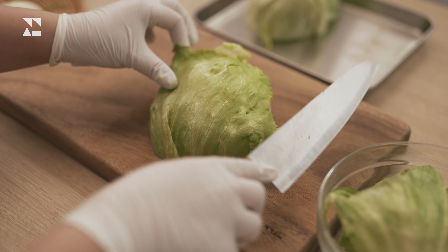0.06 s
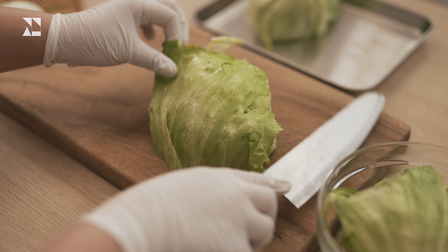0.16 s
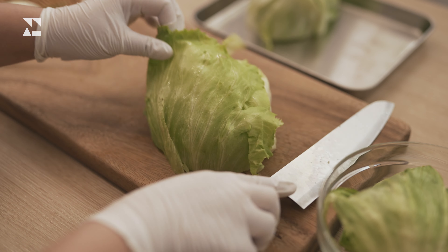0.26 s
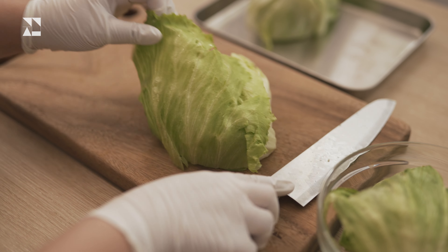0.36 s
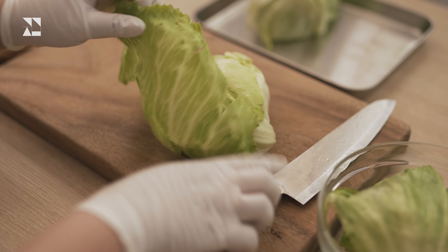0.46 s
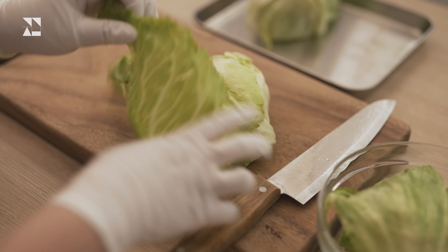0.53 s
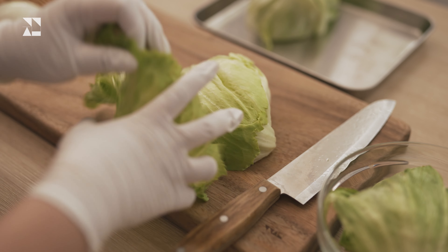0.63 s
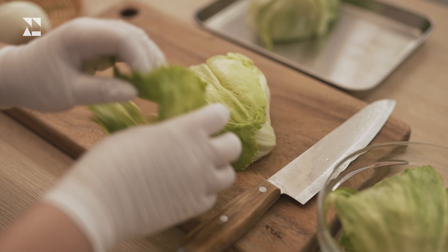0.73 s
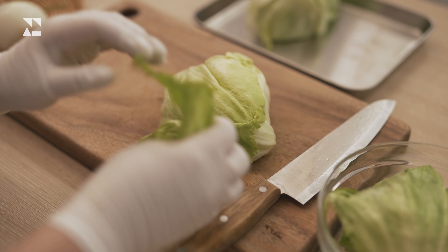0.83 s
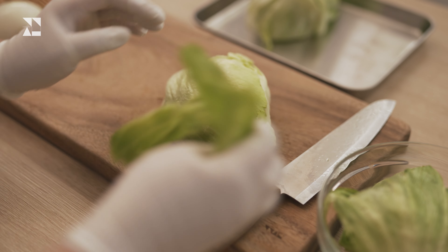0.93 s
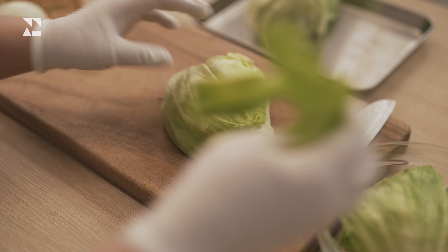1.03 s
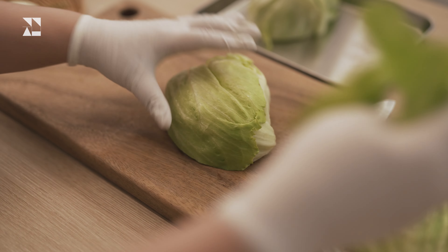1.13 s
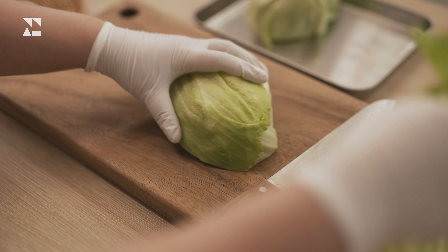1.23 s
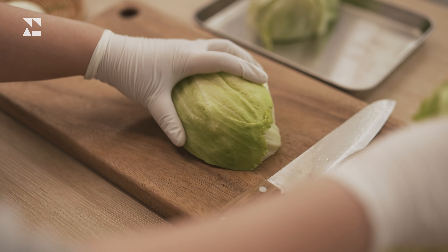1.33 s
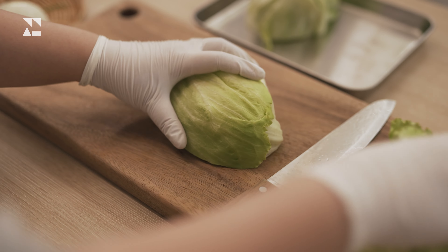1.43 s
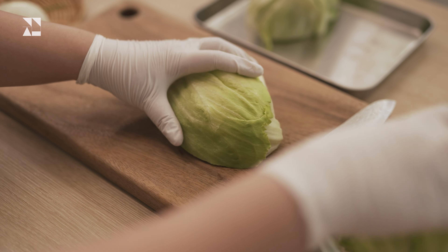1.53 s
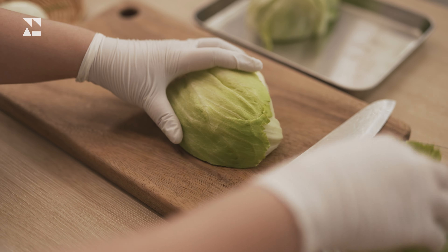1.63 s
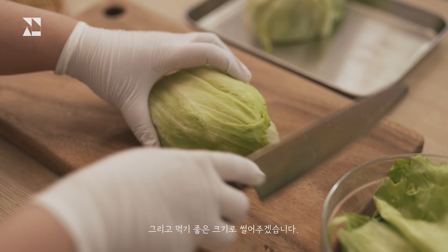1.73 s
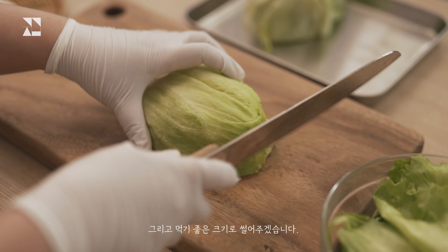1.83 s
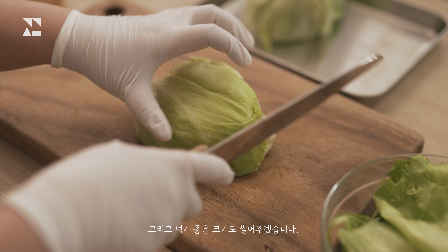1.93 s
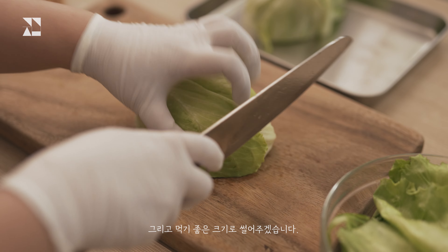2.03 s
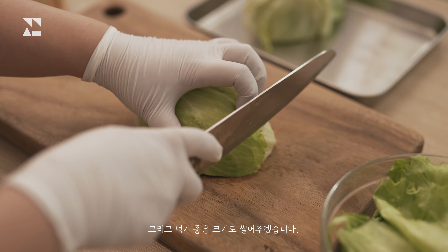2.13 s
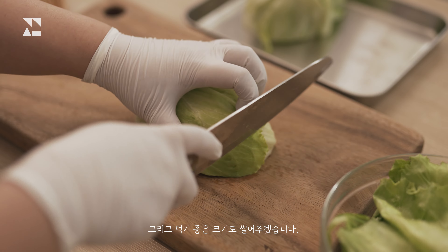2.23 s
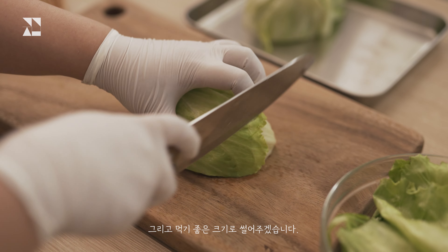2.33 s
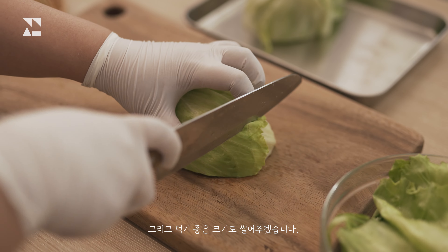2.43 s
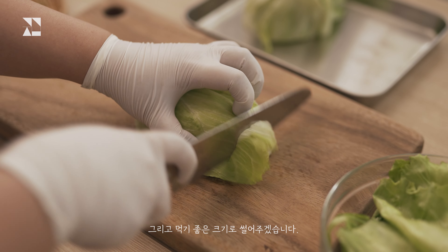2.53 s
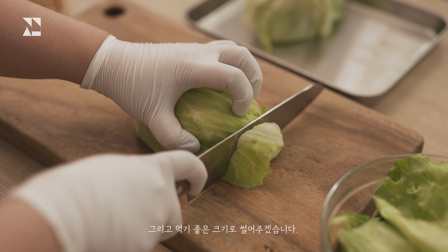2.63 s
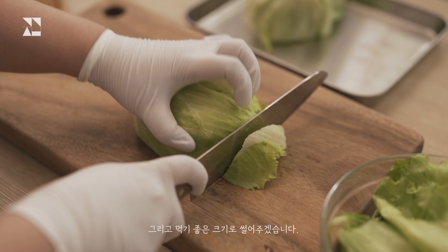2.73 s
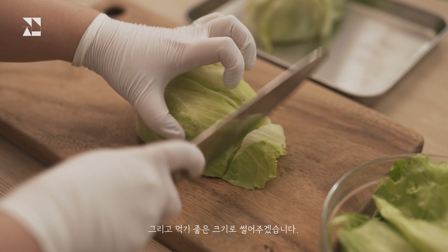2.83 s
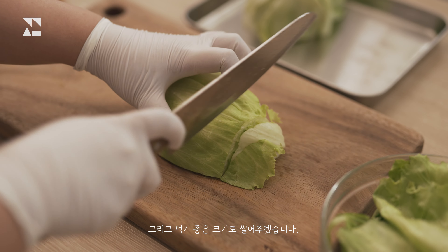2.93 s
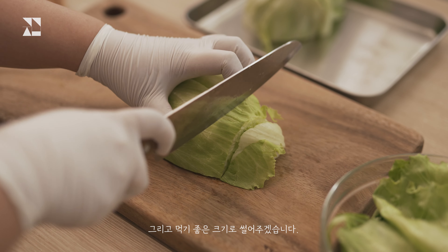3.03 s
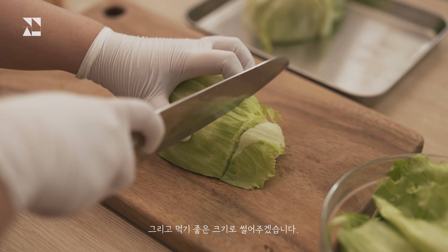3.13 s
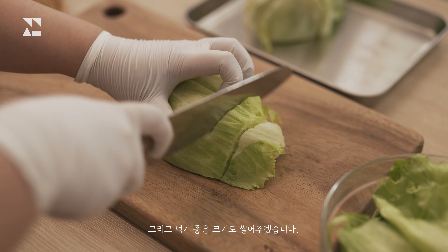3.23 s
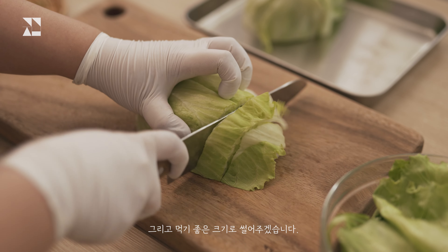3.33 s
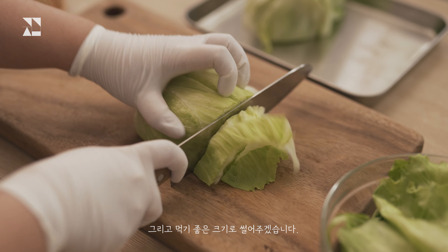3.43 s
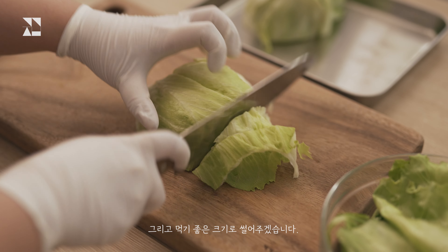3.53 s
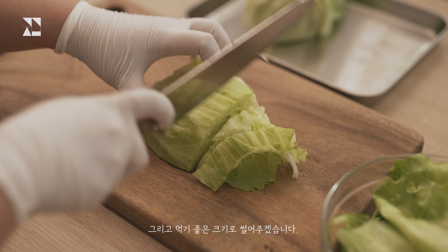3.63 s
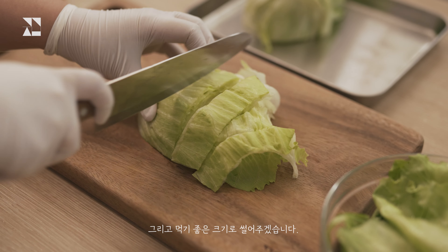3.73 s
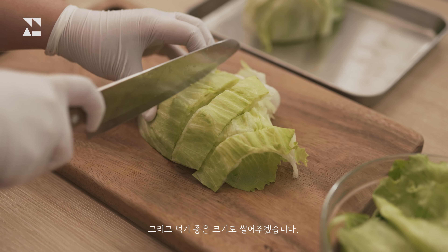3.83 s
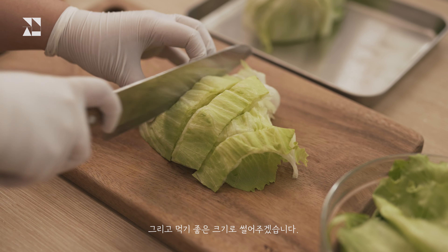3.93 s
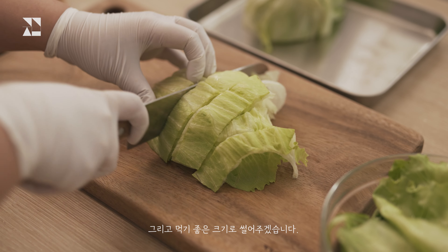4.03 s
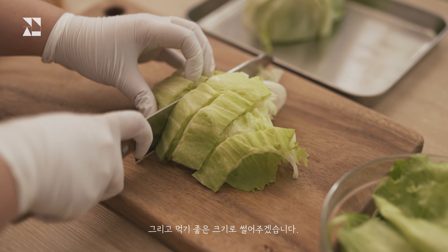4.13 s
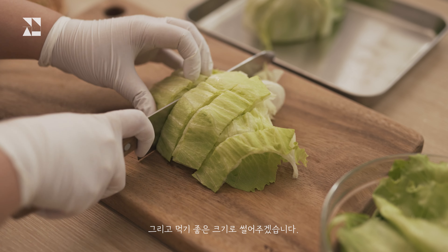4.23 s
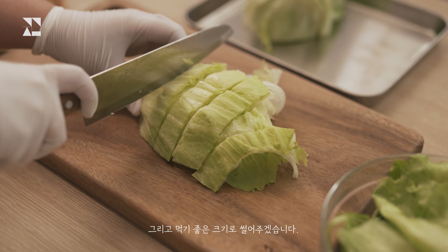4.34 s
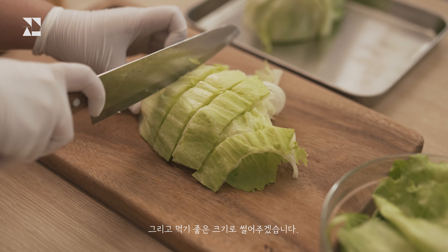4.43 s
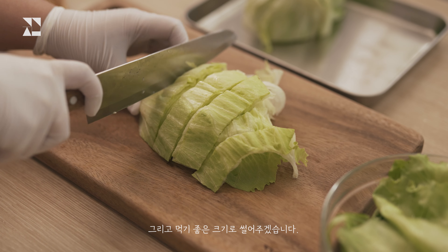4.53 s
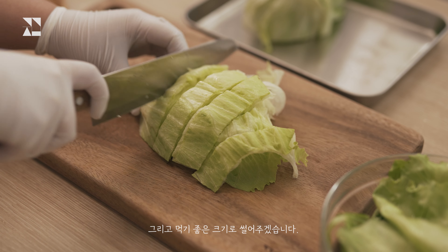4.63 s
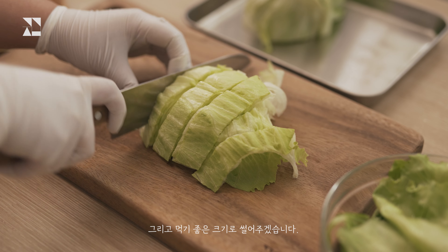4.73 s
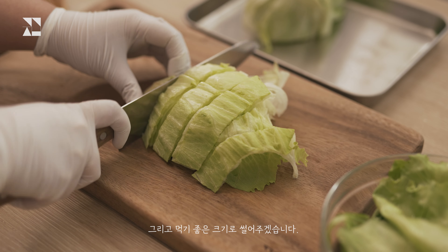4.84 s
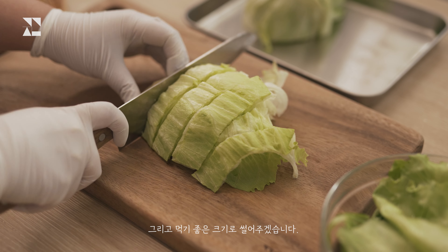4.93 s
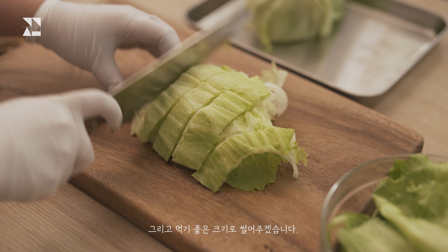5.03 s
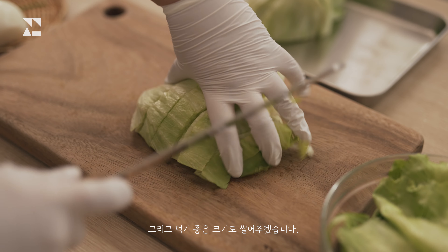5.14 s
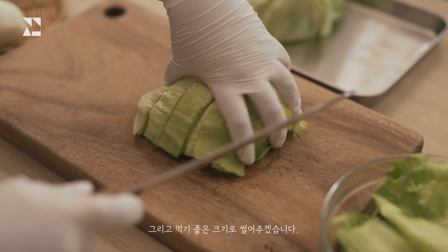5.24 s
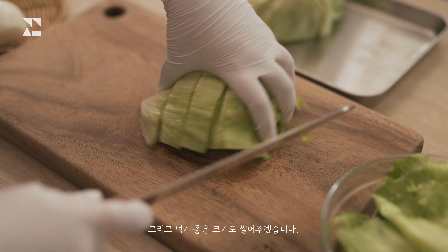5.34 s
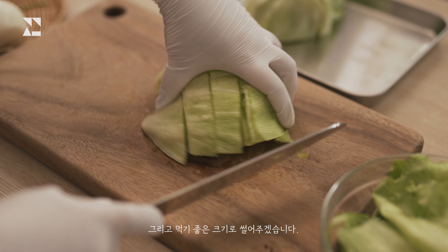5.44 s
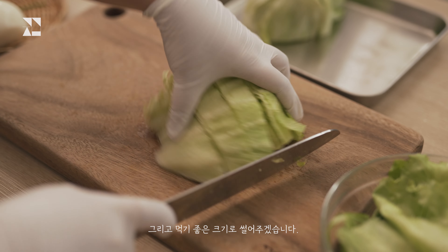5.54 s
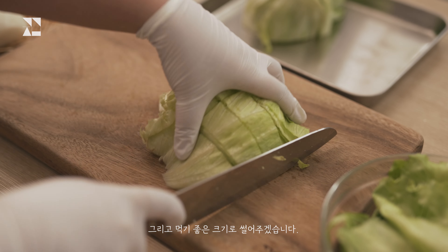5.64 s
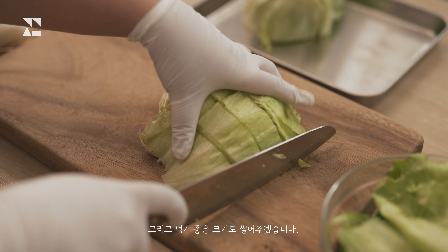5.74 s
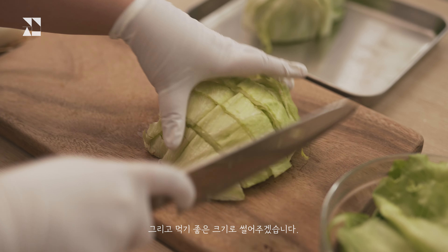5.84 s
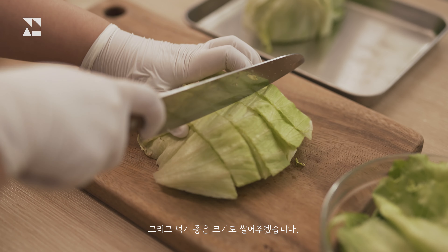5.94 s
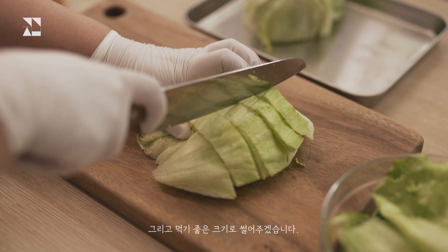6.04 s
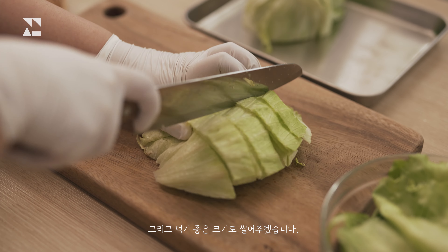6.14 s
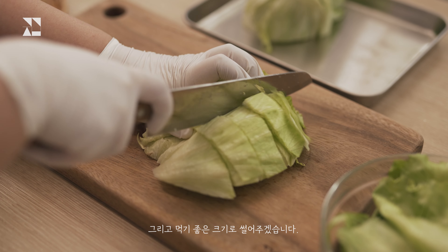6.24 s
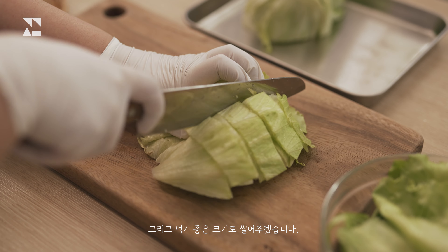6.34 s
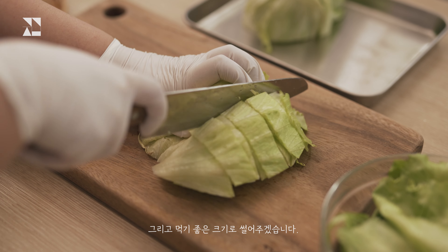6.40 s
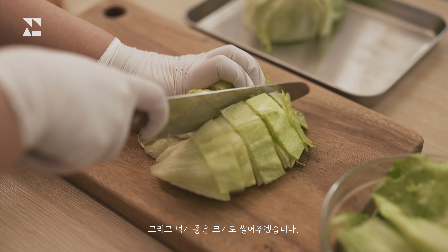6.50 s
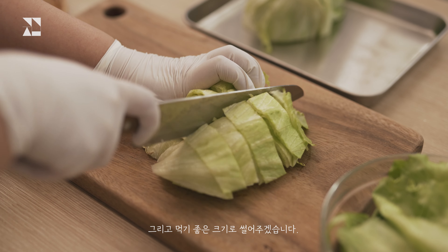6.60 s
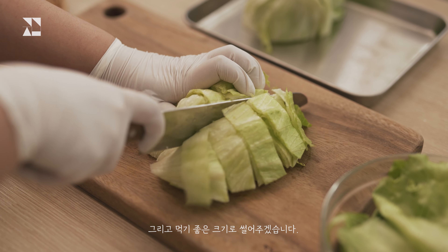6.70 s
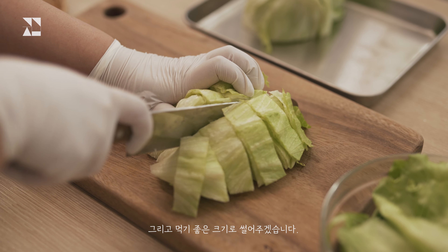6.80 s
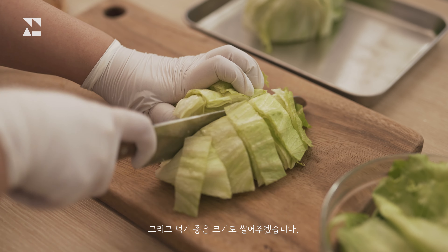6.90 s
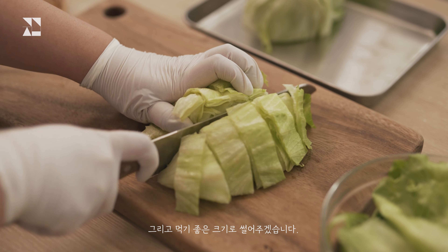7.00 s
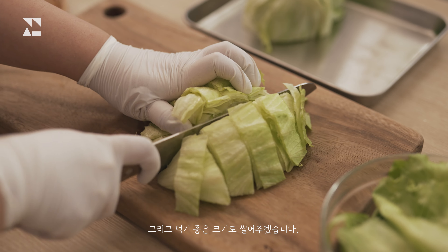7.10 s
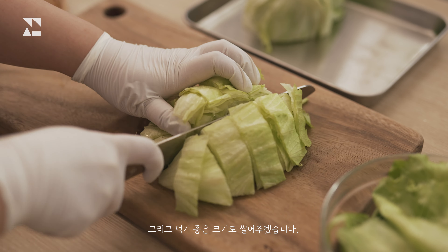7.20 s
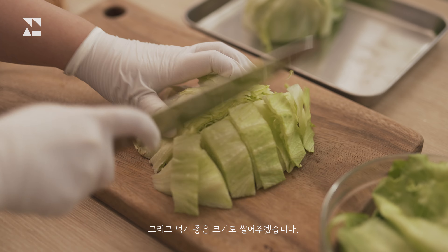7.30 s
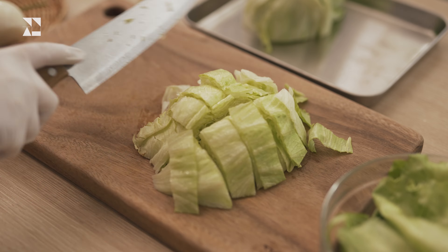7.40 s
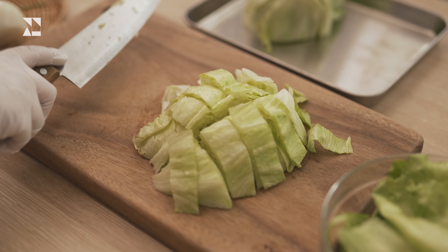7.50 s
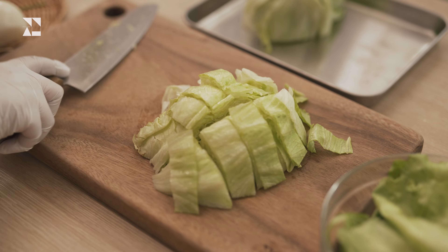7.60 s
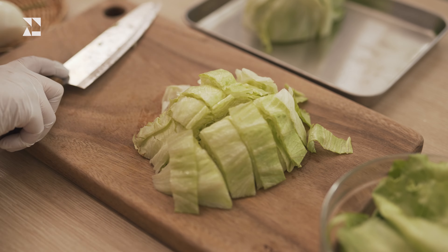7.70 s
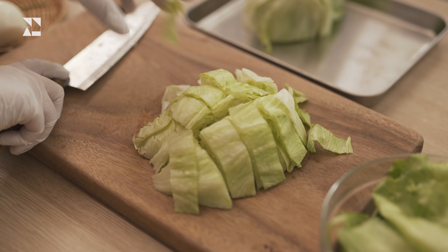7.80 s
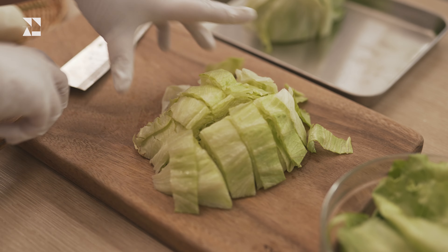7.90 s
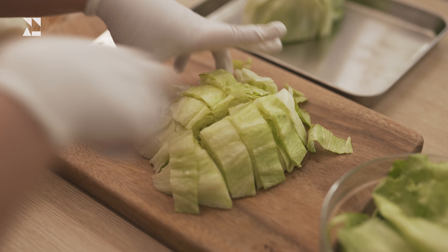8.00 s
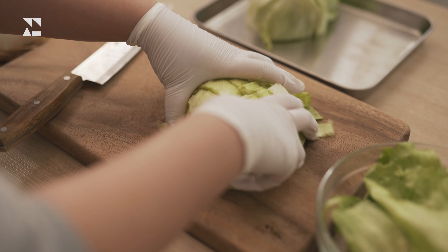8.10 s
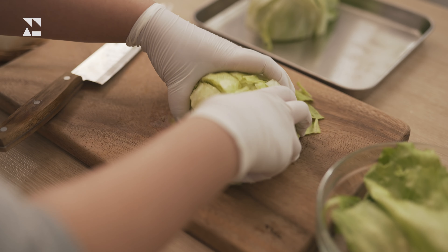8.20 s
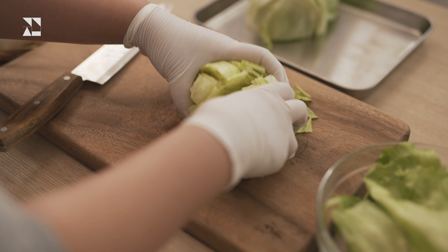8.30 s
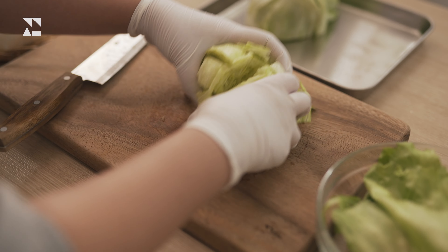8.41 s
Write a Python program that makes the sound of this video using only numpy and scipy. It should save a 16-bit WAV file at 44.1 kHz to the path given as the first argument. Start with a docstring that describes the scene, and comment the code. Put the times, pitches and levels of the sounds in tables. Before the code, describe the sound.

Gloved hands rustle and peel a crisp lettuce head, then a knife crunches through it with hard wooden knocks and a final brief steel clatter.

```python
"""A head of crisp lettuce is stripped of a leaf and sliced on a wooden board in a slightly echoing kitchen.
Gloved hands stir the leaves, the knife is laid down and ribs snap as the leaf tears off: each rib is a noise
burst through a resonance. Then strokes crunch through the head as dense random clicks in many bands, the knife
knocks on the board as decaying modes, and short drags stick and slip over the wood.
At the end the steel rings as the knife clatters down, and the gloves gather the pieces."""
import sys
import numpy as np
from scipy import signal
from scipy.io import wavfile
from scipy.ndimage import uniform_filter1d, minimum_filter1d

SR = 44100
rng = np.random.default_rng(int(sys.argv[2]) if len(sys.argv) > 2 else 0)


def transcribe(u):
    """Save the signal u as a 16-bit wav file named by the first command-line argument.

    u: samples, shape (n,) or (channels, n), limited to [-1, 1]; the rate is SR.
    q: integer samples, one column per channel.
    """
    v = np.clip(np.atleast_2d(u).T, -1, 1)
    q = np.round(v * 32767).astype(np.int16)
    wavfile.write(sys.argv[1], SR, q)


N = 373086
TIME = np.arange(N) / SR  # s

# bank of band-pass filters, each with its centre frequency in Hz
EDGES = np.geomspace(28, 17000, 24)
BANDS = [(np.sqrt(low * high), signal.butter(2, [low, high], "band", fs=SR, output="sos"))
         for low, high in zip(EDGES, EDGES[1:])]

# spectrum of rubbed leaves, cracking ribs and a chattering blade: (f/Hz, relative level/dB)
RUSTLE_SPECTRUM = [(700, -3), (1600, 1.5), (2600, 3.5), (5000, 3.5), (7000, -8), (10000, -1),
                   (12500, -26.5), (16000, -25)]
# spectrum of the hollow body of the head: (f/Hz, relative level/dB)
BODY_SPECTRUM = [(45, -23.5), (65, -25), (95, -4.5), (170, -17), (380, -24.5), (620, -8), (950, 0.5),
                 (1500, -0.5), (2500, -6), (4500, -21)]


def from_db(db):
    """Amplitude ratio: 20 dB is a factor of ten."""
    return 10 ** (np.asarray(db) / 20)


def rms_one(x):
    """Normalise the mean power: scale to unit rms."""
    return x / np.sqrt(np.mean(x ** 2) + 1e-20)


def peak_one(x):
    """Normalise the greatest amplitude: scale to unit peak."""
    return x / np.max(np.abs(x))


def at_hz(points, hz):
    """Interpolation of a spectrum on a logarithmic frequency axis."""
    hzs, values = np.transpose(points)
    return np.interp(np.log(hz), np.log(hzs), values)


def add(out, s, sound):
    """Superposition: mix a sound in at time s."""
    start = max(round(s * SR), 0)
    out[start:start + len(sound)] += sound[:N - start]


def wander(step_s):
    """Random modulation: a course of spread about 1 between fresh values at every step."""
    knots = np.arange(0, TIME[-1], max(step_s, 1e-3))
    values = np.clip(rng.standard_normal(N // 40)[:len(knots)], -2, 2)
    return np.interp(TIME, knots, values)


def effort(start, length, attack_s, release_s, power=1):
    """Envelope of one move of the hand: force builds up, holds and decays exponentially."""
    t = TIME - start
    build_up = np.clip(t / max(attack_s, 1e-3), 0, 1) ** power
    return build_up * np.exp(-np.clip((t - length) / release_s, 0, 20))


def burst(t60):
    """Exponential decay of noise: two unrelated bursts that fall 60 dB in t60 seconds."""
    t = TIME[:SR // 4]
    return rng.standard_normal((2, len(t))) * from_db(-60 * t / t60)


def colour(spectrum, sources):
    """Spectral shaping: two unrelated signals, dealt in turn to neighbouring bands, form one sound."""
    lowest, highest = spectrum[0][0] / 2, spectrum[-1][0] * 2
    return sum(from_db(at_hz(spectrum, hz)) * signal.sosfilt(sos, sources[k % 2] + 1e-18)
               for k, (hz, sos) in enumerate(BANDS) if lowest < hz < highest)


def resonance(x, hz, width_hz):
    """Damped resonance: a pole pair whose radius sets the bandwidth."""
    r = np.exp(-np.pi * width_hz / SR)
    return signal.lfilter([1 - r, 0, r - 1], [1, -2 * r * np.cos(2 * np.pi * hz / SR), r * r], x)


def ring(modes, detune):
    """Modal decay in alternating sign; place and grip shift pitch and strength from blow to blow."""
    t = TIME[:SR // 2]
    chance = rng.standard_normal((len(modes), 2))
    out = np.zeros(len(t))
    for k, ((hz, db, t60), (louder_db, higher)) in enumerate(zip(modes, chance)):
        decay = from_db(db + louder_db - 60 * t / t60)
        out += (-1) ** k * decay * np.sin(2 * np.pi * hz * (1 + detune * higher) * t)
    return out


def quiet_air():
    """Stationary noise: the room's quiet air is a steady coloured hiss and hum."""
    # spectrum of the quiet room: (f/Hz, relative level/dB)
    air_spectrum = [(15, -47), (25, -12), (64, -25.5), (97, -23.5), (206, -10), (427, -24.5), (531, -20),
                    (840, -25.5), (2840, -35), (4610, -31.5), (7110, -31), (9840, -34), (16000, -46.5)]
    return from_db(-65) * rms_one(colour(air_spectrum, rng.standard_normal((2, N))))


def fractures(per_s, spread_db, clump_db, clump_s):
    """Random impulses: cell walls burst unevenly, in clumps as one leaf after another gives way."""
    sizes = from_db(spread_db * np.minimum(rng.exponential(1, N), 4))
    clicks = (rng.random(N) < per_s / SR) * sizes * from_db(clump_db * wander(clump_s))
    # the hand keeps up a steady pressure: even out the level over 50 ms
    clicks /= np.sqrt(uniform_filter1d(clicks ** 2, size=SR // 20).clip(1e-6))
    return clicks * rng.choice([-1, 1], (2, N))


def leaves(spectrum, clicks, patchy_db, patch_s):
    """Impulse excitation of bands: fractures ring in flaps of leaf, each with a colour of its own; rms 1."""
    out = np.zeros(N)
    for k, (hz, sos) in enumerate(BANDS):
        if spectrum[0][0] < hz < spectrum[-1][0]:
            flap = from_db(at_hz(spectrum, hz) + patchy_db * wander(patch_s))
            out += flap * signal.sosfilt(sos, clicks[k % 2] + 1e-18)
    return rms_one(out)


def snap(pop_db, hz, crack_db, t60=0.012, width_share=0.18):
    """Brittle fracture: a rib breaks with a sharp crack and a short resonant pop, pitched by its size."""
    tear = burst(t60)
    pop = resonance(tear[0], hz, width_share * hz)
    around_pitch = signal.butter(2, [hz / 2, min(2 * hz, SR / 3)], "band", fs=SR, output="sos")
    pop = signal.sosfilt(around_pitch, pop)
    crack = colour(RUSTLE_SPECTRUM, tear)
    return from_db(pop_db) * peak_one(pop) + from_db(crack_db) * peak_one(crack)


def thin_ribs(count=8, per_s=16, low_hz=1440, high_hz=5000, over_rustle_db=10, crack_db=-14.5):
    """Random impulse train convolved with a snap: ribs of several sizes break at chance moments."""
    breaks = rng.random((count, N)) < per_s / count / SR
    out = np.zeros(N)
    for moments, hz in zip(breaks, np.geomspace(low_hz, high_hz, count)):
        out += signal.oaconvolve(1.0 * moments, snap(0, hz, crack_db))[:N]
    return from_db(over_rustle_db) * out


def handling(attack_s=0.017, release_s=0.011, hold_until_s=7.15, hold_rustle_db=-67):
    """Friction and bending: gloves rub a thinner crackle from the leaves, and thin ribs give way."""
    # gloves grip, peel, turn and gather, and near 3.06 s and 3.19 s the blade brushes the outer leaves: (start
    # t/s, length t/s, rustle level/dB, hollow body level/dB)
    touches = [(0.071, 0.24, -58, -55), (0.236, 0.014, -50, -51), (0.57, 0.057, -51.5, -60),
               (0.746, 0.16, -64.5, -57.5), (0.958, .11, -56, -78), (1.218, 0.4, -62.5, -57.5),
               (1.317, 0.015, -68, -48), (1.395, 0.083, -54, -46), (1.669, 0.081, -53, -39),
               (1.836, 0.053, -62, -45), (1.878, 0.031, -49.5, -44.5), (2.123, .03, -49.5, -45),
               (2.173, 0.029, -47, -35), (2.946, 0.015, -48, -40), (3.064, 0.024, -41, -42.5),
               (3.192, 0.084, -48, -48.5), (3.686, .12, -57, -63.5), (4.408, 0.15, -59, -62.5),
               (5.136, 0.61, -56.5, -59.5), (5.218, 0.087, -54, -59.5), (5.581, 0.13, -58.5, -62),
               (5.778, 0.22, -62, -64), (5.891, 0.012, -69, -49), (6.047, 0.05, -42.5, -51),
               (6.123, 0.065, -45.5, -49), (7.318, 0.028, -59.5, -55.5), (7.428, 0.026, -65.5, -75.5),
               (8.08, 0.44, -54.5, -59), (8.165, 0.17, -54, -51.5), (8.367, 0.039, -46, -47.5)]
    # even a resting hand stirs the leaves faintly
    rustle = from_db(hold_rustle_db) * effort(0, hold_until_s, attack_s, release_s)
    body = np.zeros(N)
    for start, length, rustle_db, body_db in touches:
        grip = effort(start, length, attack_s, release_s)
        rustle += grip * from_db(rustle_db)
        body += grip * from_db(body_db)
    clicks = fractures(per_s=2200, spread_db=2.8, clump_db=3.0, clump_s=0.007)
    rubbing = leaves(RUSTLE_SPECTRUM, clicks, patchy_db=4.0, patch_s=0.012)
    hollow = leaves(BODY_SPECTRUM, clicks[::-1], patchy_db=4.0, patch_s=0.0099)
    # thin ribs snap louder the harder the gloves rustle
    return rustle * (rubbing + thin_ribs()) + body * hollow


def knocks():
    """Impact excitation of modes: wood knocks, the edge bites and the counter thumps; steel rings apart."""
    # knife against board: (t/s, wood level/dB, contact sharpness f/Hz, bite of the edge level/dB,
    # ring of the steel level/dB, thump of the counter level/dB)
    blows = [(0.2894, -8.5, 2080, -44.5, -25.5, -44), (0.3395, -14, 2020, -23.5, -29.5, -55),
             (0.4716, -14, 636, -50, -36, -30), (0.4940, -16.5, 1800, -25.5, -49, -24.5),
             (2.6451, -3, 4200, 8.5, -52.5, -22), (3.4015, 3.5, 1372, 6.5, -43, -25),
             (4.083, -21, 1200, -45, -62, -51.5), (4.1120, -14.5, 1520, -28.5, -48.5, -36),
             (4.164, -17, 900, -38.5, -56, -72.5), (4.8107, -5, 1224, -8, -59.5, -36),
             (5.7245, -16.5, 790, -32, -48, -34.5), (6.9670, -14.5, 802, -15, -54, -38),
             (7.685, -7, 2200, -10, -8, -52), (7.8408, -14.5, 1500, -19.5, -26.5, -49)]
    # modes of the board with the knife on it: (f/Hz, relative level/dB, t60/s)
    wood_modes = [(210, -28.5, 0.069), (352, -23.5, 0.016), (540, -17, 0.064), (613, -13, 0.04),
                  (877, -7, 0.039), (1033, -12.5, 0.017), (1455, 2.5, 0.03), (1508, 2.5, 0.0069),
                  (1799, -19, 0.08), (2390, -16.5, 0.032), (2680, -15.5, 0.032), (3710, -16, 0.029)]
    # modes of the steel blade: (f/Hz, relative level/dB, t60/s)
    steel_modes = [(457, -12.5, 0.14), (887, -11, .1), (1493, 0, 0.18), (1453, 6.5, 0.12),
                   (1694, -6, 0.091), (1765, -6, 0.081), (2370, -7.5, 0.1), (2720, -11.5, 0.18),
                   (3920, -7, 0.097), (4800, -11.5, 0.13), (4970, -23.5, 0.086), (8300, -11, 0.024),
                   (9850, -20, 0.25), (11400, -37, 0.14)]
    # modes of the counter under the board: (f/Hz, relative level/dB, t60/s)
    counter_modes = [(101, -3, 0.064), (117, -2.5, 0.067), (165, -15, 0.062), (210, 4.5, 0.0083)]
    # spectrum of the edge biting into the wood: (f/Hz, relative level/dB)
    bite_spectrum = [(200, -15), (700, -13), (1150, -8.5), (1550, 7), (1900, -1.5), (2900, -9), (3900, -25),
                     (7000, -36), (15000, -49.5)]
    wood, steel = np.zeros(N), np.zeros(N)
    for s, wood_db, contact_hz, bite_db, steel_db, thump_db in blows:
        # a soft touch leaves the high modes still
        contact = signal.butter(2, min(contact_hz, SR / 4), fs=SR, output="sos")
        knock = signal.sosfilt(contact, ring(wood_modes, detune=0.02))
        bite = colour(bite_spectrum, burst(t60=0.023))
        thump = ring(counter_modes, detune=0.015)
        chatter = colour(RUSTLE_SPECTRUM, burst(t60=0.22))  # a loose blade chatters as it lands
        add(wood, s, from_db(wood_db) * peak_one(knock))
        add(wood, s, from_db(bite_db) * peak_one(bite))
        add(wood, s, from_db(thump_db) * peak_one(thump))
        add(steel, s, from_db(steel_db - 9.5) * peak_one(chatter))
        add(steel, s, from_db(steel_db) * peak_one(ring(steel_modes, detune=0.005)))
    return wood, steel


def snaps():
    """Successive brittle fractures: the thick ribs break one by one."""
    # thick ribs: (t/s, pop level/dB, pitch f/Hz, crack level/dB)
    rib_breaks = [(0.384, -32, 1450, -26), (0.424, -39.5, 950, -29), (1.056, -31.5, 2340, -56),
                  (1.221, -38, 2470, -58), (1.245, -39, 2220, -50), (1.278, -37, 1700, -50),
                  (1.326, -34, 624, -34.5), (1.336, -28.5, 2300, -48), (1.408, -37.5, 740, -39),
                  (1.429, -32.5, 740, -40), (1.455, -28.5, 730, -31), (1.551, -30.5, 3600, -60),
                  (1.604, -37, 840, -41), (1.696, -23, 2480, -27.5), (2.132, -42, 882, -33),
                  (2.185, -27, 1970, -55), (2.196, -45, 2200, -39), (2.384, -36.5, 1990, -37.5),
                  (2.411, -23.5, 717, -24), (2.819, -23.5, 1690, -34), (3.074, -35, 4800, -30),
                  (3.218, -25.5, 5300, -40), (3.28, -26, 1410, -22), (3.947, -32, 3120, -25),
                  (3.985, -17, 3140, -23), (3.997, -8.5, 3240, -33), (4.072, -11, 886, -34),
                  (4.082, -10, 910, -37), (4.11, -10, 1540, -23), (4.211, -22.5, 1210, -24),
                  (4.352, -34, 902, -38), (4.41, -42, 894, -37.5), (4.532, -44, 4030, -30.5),
                  (4.848, -8.5, 1496, -32), (4.874, -10.5, 2450, -42), (6.07, -36, 864, -33),
                  (6.081, -21.5, 5730, -27.5), (6.149, -33, 4870, -29.5), (6.231, -24, 2110, -28),
                  (6.25, -27, 2433, -17), (6.299, -18.5, 1005, -20), (6.471, -40, 2940, -28),
                  (6.518, -24, 965, -19), (6.543, -21.5, 2170, -17.5), (6.575, -22, 2690, -40),
                  (6.608, -25, 2440, -39), (6.678, -24, 2880, -42), (6.902, -21.5, 2190, -30.5),
                  (7.162, -43, 1392, -25.5)]
    out = np.zeros(N)
    for s, pop_db, hz, crack_db in rib_breaks:
        add(out, s, snap(pop_db, hz, crack_db))
    return out


def slicing(release_s=0.017, pressure_power=1.59, fizz_rise_share=0.69,
            fizz_sink_db_per_s=26.5, body_growth_db_per_s=21.5):
    """Dense fracture noise: juicy cells fizz, ribs crackle, and the head sounds hollower as the blade sinks."""
    # pushes of the blade: (start t/s, length t/s, time to full pressure t/s, crackle of the ribs level/dB,
    # fizz of juicy cells level/dB before it sinks, hollow body level/dB before it grows)
    strokes = [(2.395, 0.059, 0.017, -47.5, -44.5, -43), (2.527, 0.04, 0.039, -34.5, -35.5, -33),
               (2.572, 0.06, 0.011, -34.5, -45, -32), (3.794, 0.057, 0.061, -49, -45.5, -70),
               (4.596, 0.04, 0.028, -48, -44, -53.5), (3.266, 0.15, 0.031, -26, -37, -28),
               (3.909, 0.2, 0.14, -24, -33, -27.5), (4.107, 0.11, .01, -38, -45.5, -32),
               (4.67, 0.13, 0.073, -25, -33, -28.5), (4.817, 0.059, 0.013, -33.5, -45.5, -31.5),
               (6.204, 0.12, 0.086, -30.5, -33.5, -36.5), (6.377, 0.021, 0.024, -37.5, -48, -43),
               (6.442, 0.089, 0.077, -30.5, -47.5, -34.5), (6.662, 0.09, 0.061, -24.5, -45.5, -29.5),
               (6.785, 0.078, 0.013, -37.5, -60, -40), (6.914, 0.15, 0.03, -30.5, -43.5, -34)]
    # spectrum of crackling ribs: (f/Hz, relative level/dB)
    crackle_spectrum = [(400, -24.5), (900, -0.5), (1800, 12.5), (3000, 13), (4800, 6), (7000, -22.5),
                        (10000, -7.5), (12500, -29), (16000, -34.5)]
    # spectrum of bursting juicy cells: (f/Hz, relative level/dB)
    fizz_spectrum = [(4000, -2.5), (6000, -2), (8000, 7), (10200, -5), (12500, -7.5), (16000, -17)]
    crackle, fizz, body = np.zeros((3, N))
    for start, length, rise_s, crackle_db, fizz_db, body_db in strokes:
        # the deeper the blade, the duller and hollower the cut
        sunk_s = np.clip(TIME - start, 0, length)
        pressure = effort(start, length, rise_s, release_s, pressure_power)
        # the juicy outer leaves burst before the pressure is full
        entry = effort(start, length, fizz_rise_share * rise_s, release_s, pressure_power)
        crackle += pressure * from_db(crackle_db)
        fizz += entry * from_db(fizz_db - fizz_sink_db_per_s * sunk_s)
        body += pressure * from_db(body_db + body_growth_db_per_s * sunk_s)
    clicks = fractures(per_s=3000, spread_db=2.0, clump_db=1.0, clump_s=0.0035)
    ribs = leaves(crackle_spectrum, clicks, patchy_db=3.0, patch_s=0.012)
    juice = leaves(fizz_spectrum, clicks, patchy_db=4.5, patch_s=0.018)
    hollow = leaves(BODY_SPECTRUM, clicks[::-1], patchy_db=3.0, patch_s=0.014)
    return crackle * ribs + fizz * juice + body * hollow


def drags(board_hz=940, width_hz=190, attack_s=0.01, release_s=0.021):
    """Stick-slip friction: slips of the blade or cut head on the wood stir one resonance of the board."""
    # moves over the board: (start t/s, length t/s, level/dB)
    scrapes = [(4.239, 0.12, -48.5), (5.213, 0.084, -58.5), (6.217, 0.1, -39.5), (6.375, 0.017, -44),
               (8.228, 0.049, -46)]
    pressure = sum(from_db(db) * effort(start, length, attack_s, release_s) for start, length, db in scrapes)
    slips = fractures(per_s=640, spread_db=5.0, clump_db=8.0, clump_s=0.028)[0]
    board = resonance(resonance(slips, board_hz, width_hz), board_hz, 3 * width_hz)
    return pressure * rms_one(board)


def kitchen(x, first_echo_s=0.0027, build_s=0.0067):
    """Reverberation by convolution: wall echoes thicken quickly, then each band decays at its own rate."""
    # reverberation time: (f/Hz, t60/s)
    decay_times = [(80, 0.57), (250, 0.37), (600, 0.52), (1500, 0.5), (4000, 0.4), (10000, 0.48)]
    # how strongly the walls answer: (f/Hz, level/dB)
    echo_levels = [(90, -6), (300, -4.5), (700, -8.5), (1600, -9.5), (3000, -6.5), (6000, -8),
                   (12000, -9.5)]
    t, response = TIME[:SR], np.zeros(SR)
    white = rng.standard_normal((2, SR))
    swell = 1 - np.exp(-np.maximum(t - first_echo_s, 0) / build_s)
    for k, (hz, sos) in enumerate(BANDS):
        shape = swell * from_db(-60 * t / at_hz(decay_times, hz))
        echoes = signal.sosfilt(sos, white[k % 2]) * shape / np.linalg.norm(shape)
        response += from_db(at_hz(echo_levels, hz)) * echoes
    return signal.fftconvolve(x, response)[:N]


def scene():
    """Superposition of direct and reflected sound: lettuce and knife close by, echo and quiet air."""
    air = quiet_air()
    lettuce = handling() + snaps() + slicing() + drags()
    wood, steel = knocks()
    walls = wood + from_db(-2.0) * lettuce + from_db(-5.0) * steel
    return (lettuce + wood + steel + kitchen(walls) + air)[None]


def record(dry, low_cut_hz=55, ceiling_db=0.06, release_db_per_s=350, cutoff_hz=16000):
    """Band limiting and peak limiting: deep bass is shed, a fast limiter holds peaks, the top is cut."""
    heard = signal.sosfilt(signal.butter(2, low_cut_hz, "high", fs=SR, output="sos"), dry)
    over_db = np.maximum(20 * np.log10(np.abs(heard[0]) + 1e-9) - ceiling_db, 0)
    # hold each peak's excess and let it go at a steady rate
    recovery_db = release_db_per_s * TIME
    held_db = np.maximum.accumulate(over_db + recovery_db) - recovery_db
    # the gain starts to fall just ahead of each peak
    gain_db = uniform_filter1d(minimum_filter1d(-held_db, size=33), size=33)
    top_cut = signal.ellip(10, 0.1, 80, cutoff_hz, fs=SR, output="sos")
    return signal.sosfilt(top_cut, heard * from_db(gain_db))


dry = scene()
out = record(dry)
transcribe(out)
```